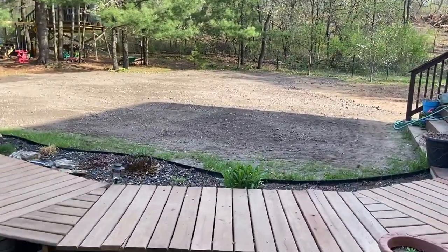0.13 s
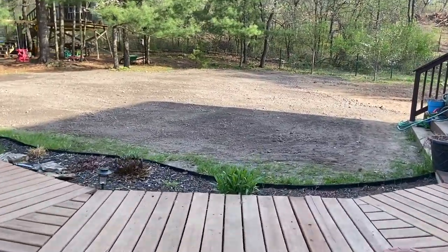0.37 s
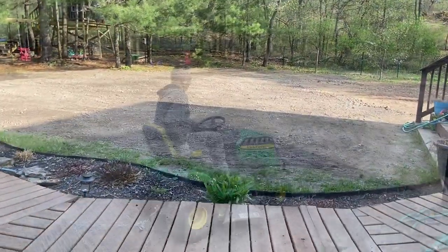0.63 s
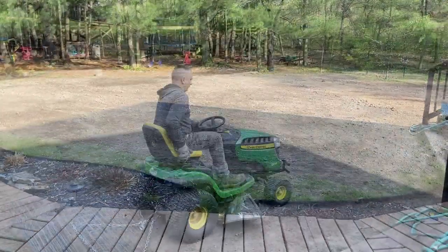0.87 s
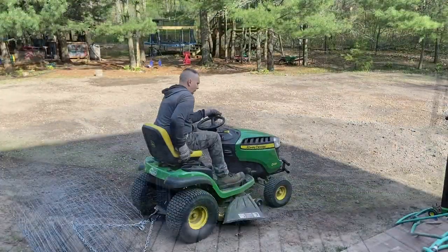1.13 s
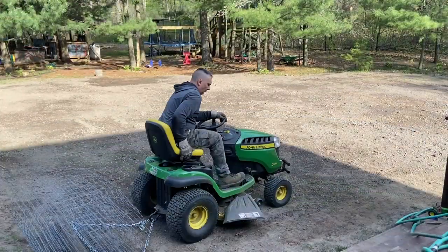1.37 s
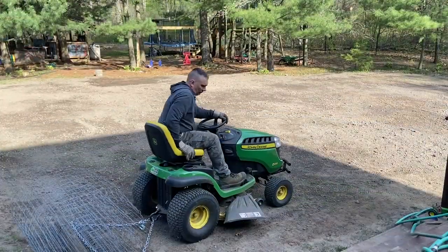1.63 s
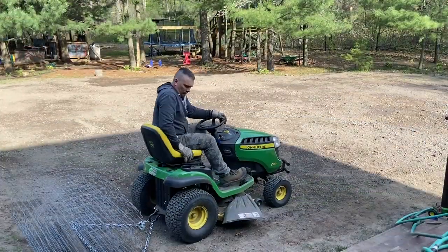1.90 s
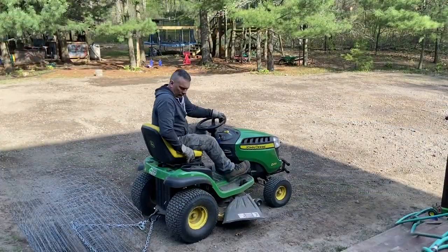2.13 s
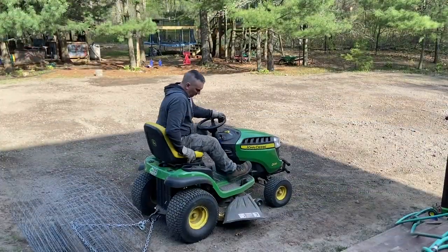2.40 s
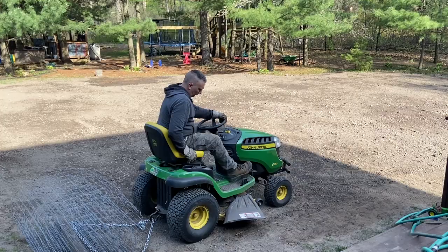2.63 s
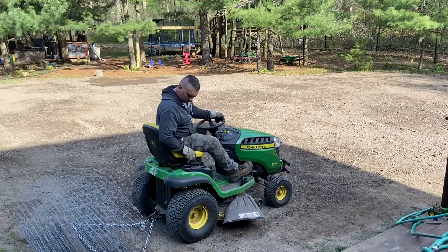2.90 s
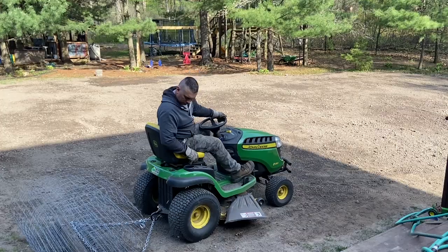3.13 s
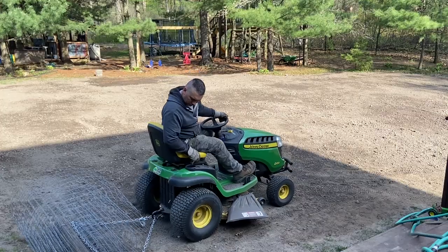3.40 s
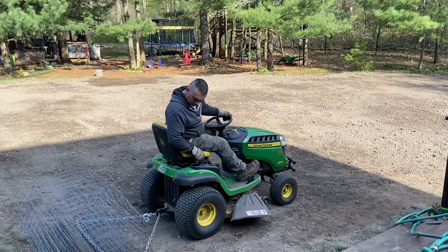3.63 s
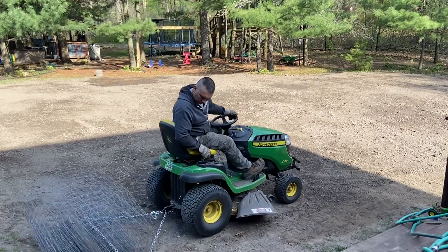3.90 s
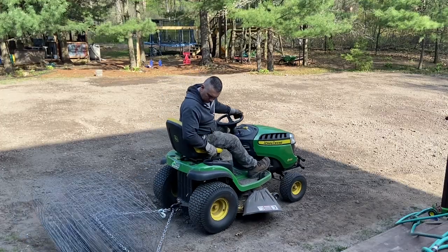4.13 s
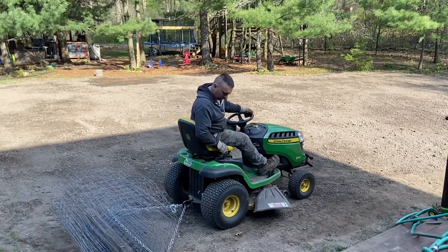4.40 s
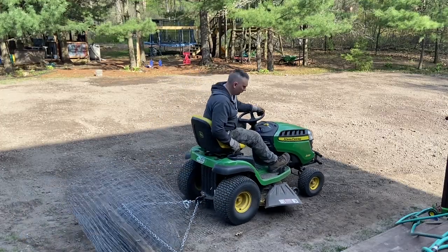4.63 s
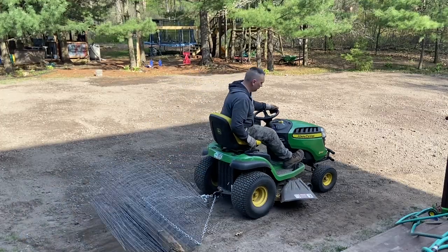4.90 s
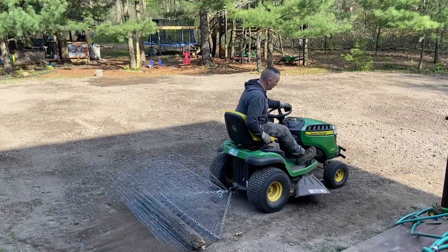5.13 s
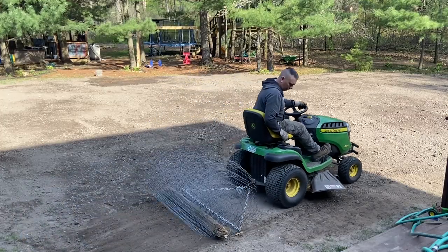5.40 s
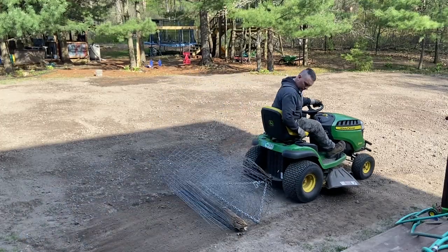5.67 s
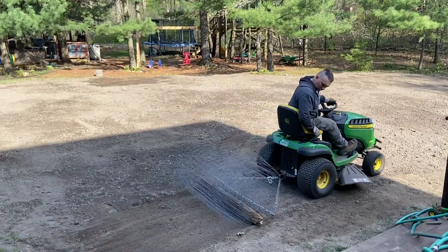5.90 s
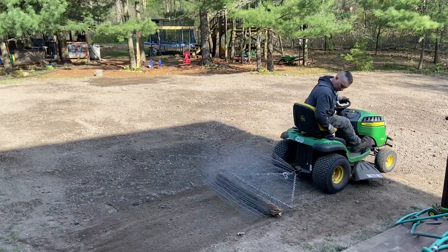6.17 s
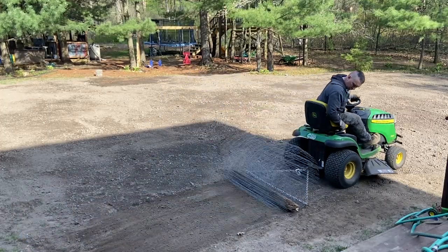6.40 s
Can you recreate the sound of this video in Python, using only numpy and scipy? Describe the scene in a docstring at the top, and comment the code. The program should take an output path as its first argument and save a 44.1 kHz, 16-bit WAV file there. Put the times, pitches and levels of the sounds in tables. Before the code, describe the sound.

Soft wind and small ticks fade into a steady, uneven mower chug, then metallic scraping over dirt and brief chain clinks.

```python
"""A quiet, breezy yard: wind lumps, faint crackles and a raspy hiss give way to a nearby riding mower.
Its two cylinders fire unevenly, a throbbing stack of low sine orders under noise for fan roar, valves and tin.
Filtered grit noise makes a wire drag scraping over dirt; decaying high sines make its chain clink.
The engine labours as the drag bites, then its levels shift as the mower turns away."""
import sys
import numpy as np
from scipy import signal
from scipy.io import wavfile
from scipy.ndimage import uniform_filter1d

SR = 44100
rng = np.random.default_rng(int(sys.argv[2]) if len(sys.argv) > 2 else 0)


def transcribe(u):
    """Save the signal u as a 16-bit wav file named by the first command-line argument.

    u: samples, shape (n,) or (channels, n), limited to [-1, 1]; the rate is SR.
    q: integer samples, one column per channel.
    """
    v = np.clip(np.atleast_2d(u).T, -1, 1)
    q = np.round(v * 32767).astype(np.int16)
    wavfile.write(sys.argv[1], SR, q)


def field_ratio(decibels):
    """Amplitude ratio for a level in dB (20 dB per decade); scalars and array-likes work."""
    return 10 ** (np.asarray(decibels, dtype=float) / 20)


N = 287973

# Hiss colour of the valves and of the drag's rustle: f/Hz, relative density/dB
HISS_COLOUR = [(1200, -10.5), (2500, -1.5), (4500, -5), (5500, -9), (8000, -10), (11000, -15), (15800, -23)]
# Engine speed: t/s, cycle rate/Hz
ENGINE_SPEED = [(0.5, 21.3), (0.58, 21.5), (1.0, 23.0), (1.1, 23.3), (1.36, 23.3), (1.54, 23.0),
                (2.7, 22.7), (3.4, 22.1), (3.52, 21.9), (3.79, 21.7), (3.93, 21.7), (4.13, 22.0),
                (5.39, 22.8), (5.89, 22.5), (6.31, 22.2), (6.46, 21.8), (6.53, 21.6)]


def evened(x):
    """Scales a signal to rms 1."""
    return x / np.sqrt(np.mean(abs(x) ** 2) + 1e-20)


def curves(rows):
    """Reads each column of a timed table at every sample."""
    s, *columns = np.transpose(rows)
    return [np.interp(np.arange(N) / SR, s, c, left=c[0]) for c in columns]


def side_share(pan_db):
    """Share of the sum fed to the difference for a left-right lean; milder than an exact pan."""
    return (field_ratio(pan_db) - 1) / (field_ratio(pan_db) + 2.5)


def noise(spectrum, patchy_db, size=1024):
    """Random short-time spectra with drifting patches, as sum and difference of two microphone ports."""
    # Independent part of the difference: f/Hz, level over the sum/dB
    apart_colour = [(40, -28), (90, 2), (200, -2.5), (400, -6), (700, -9.5), (1300, -7.5), (2300, -11),
                    (2700, -15), (4400, -22), (4800, -3.5), (6300, -9), (6900, -24), (8000, -22), (8300, 1),
                    (10100, 0), (10400, -29), (11700, -26), (12000, 1), (14400, 1), (14700, -33)]
    # Bands where the sum is nearly empty and the difference carries the noise:
    # low f/Hz, high f/Hz, change of the sum/dB
    sum_gaps = [(8350, 9600, -40), (12800, 14100, -40)]
    # Stereo lean: f/Hz, nominal left over right/dB
    lean_colour = [(60, 1), (800, -2.5), (1500, -1.5), (2800, 1.3), (5500, 4), (7500, 1)]
    hop = size // 4
    hz = np.fft.rfftfreq(size, 1 / SR)

    def read(points):
        f, db = np.transpose(points)
        return np.interp(np.log(hz + 1), np.log(f + 1), db)

    a, b, c, d, patches = rng.standard_normal((N // hop + 5, len(hz), 5)).T
    patches = uniform_filter1d(patches, 10, axis=0)
    patches = evened(uniform_filter1d(patches, 12, axis=1))
    sum_db = read(spectrum)
    apart_db = sum_db + read(apart_colour)
    for lo_hz, hi_hz, change_db in sum_gaps:
        sum_db[(hz > lo_hz) & (hz < hi_hz)] += change_db
    total = (a + 1j * b) * field_ratio(sum_db)[:, None]
    apart = (c + 1j * d) * field_ratio(apart_db)[:, None]
    apart = apart + total * side_share(read(lean_colour))[:, None]
    frames = np.array([total, apart]) * field_ratio(patchy_db * patches)
    x = signal.istft(frames, nperseg=size, noverlap=size - hop)[1][:, :N]
    return x / np.sqrt(np.mean(x[0] ** 2))  # the sum has rms 1


def band(x, hz, width):
    """A steep resonance of gain 1: shift its pitch to zero, smooth twice, shift back."""
    turn = np.exp(2j * np.pi * np.cumsum(hz * np.ones(N)) / SR)
    r = np.exp(-np.pi * width / SR)
    return 2 * (turn * signal.lfilter([(1 - r) ** 2], [1, -2 * r, r * r], x / turn)).real


def wind():
    """Wind lumps on the microphone: deep filtered noise, nearly all in the sum."""
    # Rumble: t/s, level/dB
    wind_levels = [(0.0, -31), (0.118, -39), (0.192, -45), (0.226, -42), (0.3, -50), (0.576, -51),
                   (0.62, -51)]
    low = signal.butter(2, [40, 95], "band", fs=SR, output="sos")
    rumble = evened(signal.sosfilt(low, rng.standard_normal((2, N))))
    return rumble * [[1], [.04]] * field_ratio(curves(wind_levels)[0])


def rasp():
    """A raspy narrow hiss: resonant noise in two soft-edged stretches."""
    # Stretches: start t/s, length/s, level at start/dB, level at end/dB
    stretches = [(0.0, .085, -54, -60), (0.098, 0.329, -74, -52)]
    edge_s = 0.011
    t, swell = np.arange(N) / SR, np.zeros(N)
    for s, long_s, start_db, end_db in stretches:
        glide = field_ratio(start_db + (end_db - start_db) * np.clip((t - s) / long_s, 0, 1))
        swell += glide * np.clip(np.minimum(t - s + edge_s, s + long_s - t) / edge_s, 0, 1)
    narrow = evened(band(rng.standard_normal((2, N)), 1740, 240))
    return narrow * [[1], [.3]] * swell


def air():
    """Still yard air: faint, very patchy noise."""
    # Air colour: f/Hz, relative density/dB
    air_colour = [(150, -27), (250, 3), (1190, -5), (1740, -8), (2340, -6.5), (7490, -21.5), (8610, -35),
                  (10600, -25), (15800, -34)]
    return noise(air_colour, patchy_db=5.0, size=512) * field_ratio(-58)


def knock():
    """A soft knock on the camera: a decaying sine whose pitch sags."""
    # Knock: t/s, level before the decay/dB, f reached 2 ms in/Hz, t60/s
    bump = (.082, -26, 210, .16)
    s, db, hz, t60 = bump
    t = np.maximum(np.arange(N) / SR - s, 0)
    onset = 1 - np.exp(-(t / 0.0047) ** 2)
    sagging = np.sin(2 * np.pi * hz * 0.013 * np.log(1 + t / 0.011))
    return np.outer([1, 0], field_ratio(db - 60 * t / t60) * onset * sagging)


def crackles():
    """Small dry crackles: fast-decaying bright noise, some placed by chance."""
    # Placed crackles: t/s, nominal level/dB, nominal left over right/dB
    placed = [(0.0428, -51.5, 1.0), (0.1595, -50.5, 1.0), (0.2309, -41.5, 1.0), (0.2584, -54.5, -2.0),
              (0.2788, -59, 0.5), (0.3716, -52.5, 1.0), (0.4754, -50, 2.5), (0.4844, -48, 2.5),
              (0.5871, -54.5, -2)]
    faint = [(0.6 * u, -61, 1.5) for u in rng.random(size=6)]  # same columns, within 0.6 s
    out, t = np.zeros((2, N)), np.arange(1000) / SR
    bright = signal.butter(1, [6000, 13000], "band", fs=SR, output="sos")
    for s, db, pan_db in placed + faint:
        snap = signal.sosfilt(bright, rng.standard_normal((2, 1000))) * field_ratio(db - 60 * t / 0.024)
        out[:, round(s * SR):][:, :1000] += [snap[0], snap[0] * side_share(pan_db) + snap[1]]
    return out


def yard():
    """Wind, rasp, air, knock and crackles, faded out from 0.6 to 1.1 s."""
    fade_out = np.clip((1.1 - np.arange(N) / SR) / .5, 0, 1)
    return (wind() + rasp() + air() + knock() + crackles()) * fade_out


def jolt():
    """The frame hums briefly and dully as the chain pulls taut: resonant noise, rising then decaying."""
    # Hum: t/s, level before rise and decay/dB, f/Hz, width/Hz, rise/s, t60/s
    frame_hum = (3.37, -31, 388, 40, .06, .5)
    s, db, hz, width, rise, t60 = frame_hum
    t = np.maximum(np.arange(N) / SR - s, 0)
    envelope = np.minimum(t / rise, 1) * field_ratio(db - 60 * np.maximum(t - rise, 0) / t60)
    hum = evened(band(rng.standard_normal(N), hz, width)) * envelope
    return np.outer([1, .1], hum)


def chain():
    """Links knock together: a noise tick and a short ring of high decaying sines."""
    # Ring partials: f/Hz, level within the ring/dB, t60 before the length factor/s
    partials = [(5530, -7, 0.062), (6670, -1, 0.035), (10200, -11, 0.034), (12340, -8, 0.069)]
    # Clinks: t/s, ring level/dB, ring length factor, nominal tick level/dB
    clinks = [(4.203, -20.5, 0.3, -41), (4.499, -30.5, 1.3, -52), (5.95, -30, .3, -48)]
    out, t = np.zeros(N + 4000), np.arange(4000) / SR
    for s, ring_db, long, tick_db in clinks:
        ring = np.zeros(4000)
        for f, db, t60 in partials:
            ring += field_ratio(ring_db + db - 60 * t / (t60 * long)) * np.sin(2 * np.pi * f * t)
        tick = field_ratio(tick_db - 60 * t / 0.045) * np.diff(rng.standard_normal(4001))
        out[round(s * SR):][:4000] += (ring + tick) * np.minimum(t / 0.0012, 1)
    return np.outer([1, .4], out[:N])


def drag():
    """Grit strikes the wires: dense clicks into a broad ring, wire modes that come and go, and a rustle."""
    # Scrape over dirt: t/s, nominal level/dB
    scrape = [(2.5, -100), (2.9, -57), (3.3, -44), (3.85, -40.5), (4.2, -42), (4.8, -41.5), (5.3, -45.5),
              (5.8, -45.5), (6.5, -48)]
    # Wire modes: f/Hz, width/Hz, level over the broad ring/dB
    wire_modes = [(1855, 100, -17), (2247, 96, -7.5), (2360, 77, -7), (2585, 64, -7.5), (2768, 86, -14),
                  (3160, 50, -11), (3326, 54, -11.5), (3700, 90, -12)]
    t, knots = np.arange(N) / SR, np.arange(0, N / SR + .3, .2)
    strength = field_ratio(2.6 * np.minimum(rng.exponential(1, N), 4))
    struck = rng.random(N) < 2500 / SR  # about 2500 clicks per second
    grit = strength * struck * rng.standard_normal(N)
    wires = evened(band(grit, 2460, 1700))
    touches = rng.standard_normal((len(knots), len(wire_modes))).T
    for (hz, width, db), touch in zip(wire_modes, touches):
        wires += field_ratio(db + 2.1 * np.interp(t, knots, touch)) * evened(band(grit, hz, width))
    density = evened(uniform_filter1d(abs(grit), 300))
    rustle = noise(HISS_COLOUR, patchy_db=5.5, size=256) * density
    return (np.outer([1, .1], wires) + field_ratio(-2.0) * rustle) * field_ratio(curves(scrape)[0])


def level(free_db, load_db, away_db, slope_db):
    """A level in dB that shifts with engine load, the turn away and speed (dB per Hz about 22.5 Hz)."""
    # Load eases after revving up and peaks as the drag bites: t/s, share 0-1
    load = [(1.2, 0.54), (1.8, 0), (3.2, .14), (3.8, 1), (4.2, 0.96), (5.2, 0.9), (5.7, 0.4), (6.5, 0.66)]
    turn_start_s, turn_s = 4.45, 1.88
    away = np.clip((np.arange(N) / SR - turn_start_s) / turn_s, 0, 1)
    faster_hz = curves(ENGINE_SPEED)[0] - 22.5
    return free_db + load_db * curves(load)[0] + away_db * away + slope_db * faster_hz


def exhaust(turns, hz, second=1.1, waver_db=.6, waver_turns=.01):
    """Sine orders of two uneven firings, turned in phase by the muffler chamber."""
    # Orders from 2 up: rms running free/dB, change at full load/dB, change turned away/dB, slope/(dB per Hz)
    order_levels = [(-31, 0.5, -4.0, 2.5), (-25, -7.5, 0, -4), (-35, -6, -19, 0), (-20.5, 3.5, 1.5, 2),
                    (-29, -1, -11, 3), (-27.5, 1.5, -4.5, 1), (-23.5, -1.0, 0.5, -3), (-33.5, 0.5, 3, 1),
                    (-30, -0.5, -6.5, 2), (-32, -2.0, 1.5, 8), (-39.5, -8, -4, 3.5), (-43.5, -4, 3, 0.0),
                    (-54, 2.5, -1, 3), (-54, 5.0, -3, 1), (-39, 0, -1, 4), (-40.5, 3.0, -8.5, -1),
                    (-42.5, 4, -10, 3.5), (-39.0, 2, -13, 3), (-55, 2, -4, -3), (-51.5, 9.5, -1, 4)]
    # Muffler chamber: f/Hz, width/Hz, phase lead below resonance/rad
    muffler = (104, 6, .66)
    # Moments when the engine burns unevenly: t/s
    stumbles = [1.47, 2.33, 2.8, 5.45]
    # A resonance climbing through the upper orders during the pull: t/s, f/Hz, boost/dB
    climb = [(3.3, 353, -2), (3.8, 349, 2.5), (4.5, 395, -0.5), (4.9, 462, 5.5), (5.5, 470, 4.5),
             (5.9, 478, -1)]
    climb_width_hz = 23
    second_firing = .362  # share of a cycle between the V engine's two pulses, one pipe being shorter
    order = np.arange(len(order_levels)) + 2
    half_gap = np.exp(1j * np.pi * order * second_firing)
    ring_hz, width, lead = muffler
    f = order * hz.mean()
    chamber_phase = lead - np.arctan2(f * width, ring_hz ** 2 - f ** 2)
    phase = np.angle(half_gap + second / half_gap) + chamber_phase
    knots = np.arange(0, N / SR + .1, .045)  # chance wavers: no two cycles burn alike
    chance = rng.standard_normal((len(knots), len(order), 2))
    unrest = sum(np.exp(-((knots - s) / 0.037) ** 2) for s in stumbles)
    chance *= 1 + 1.1 * unrest[:, None, None]
    t, out = np.arange(N) / SR, np.zeros(N)
    strongest_db = level(*max(order_levels))
    climb_hz, boost_db = curves(climb)
    for k, (m, rule) in enumerate(zip(order, order_levels)):
        db = level(*rule) + boost_db * np.exp(-((m * hz - climb_hz) / climb_width_hz) ** 2)
        loose = np.clip((strongest_db - db) / 12, .1, 1.4)  # weak orders waver more
        slip = waver_turns * loose * np.interp(t, knots, chance[:, k, 1])
        db += waver_db * loose * np.interp(t, knots, chance[:, k, 0])
        out += field_ratio(db) * np.cos(2 * np.pi * (m * turns + slip) + phase[k])
    throb = np.sqrt(2) * out
    lean_db = level(free_db=-1.7, load_db=-.3, away_db=1.3, slope_db=0)  # nominal left over right
    return np.array([throb, throb * side_share(lean_db)])


def puffs(turns, at, depth, width):
    """A swell once in each engine cycle, at a given share of the cycle."""
    return evened(1 + depth * np.exp((np.cos(2 * np.pi * (turns - at)) - 1) / width))


def fan_roar(turns):
    """Low, broad noise with a slight swell each cycle."""
    # Roar colour: f/Hz, relative density/dB
    roar_colour = [(30, -3), (70, 5), (130, -2), (220, -3), (310, -3.5), (420, -3.5), (700, -3), (1000, -7),
                   (1500, -13), (3000, -67)]
    roar = noise(roar_colour, patchy_db=0.72, size=2048) * puffs(turns, at=1.0, depth=0.074, width=0.11)
    return roar * field_ratio(level(free_db=-27.5, load_db=-0.1, away_db=-5, slope_db=0.6))


def tin_clatter(turns):
    """Mid noise plus tin resonances of hood and deck, louder and softer by chance."""
    # Clatter colour: f/Hz, relative density/dB
    clatter_colour = [(500, -20), (1000, -5), (1400, 2), (1900, 0), (2500, -7), (3500, -14), (7000, -29)]
    # Hood and deck resonances: f/Hz, width/Hz, level over the plain clatter/dB
    tin_modes = [(520.5, 33, -9.5), (656, 23, -12), (843.4, 14, -9), (981, 24, -10), (1249, 7.5, -12.5),
                 (1380, 11.4, -8), (1542, 17, -14.5), (1770, 9.6, -13.5), (2435, 28, -18.5),
                 (4420, 73, -19.5)]
    rattle_db, rattle_s = 0.8, .09  # spread and spacing of the chance levels
    clatter, shake = noise(clatter_colour, patchy_db=0.27), rng.standard_normal(N)
    for f, width, db in tin_modes:
        clatter[0] += field_ratio(db) * evened(band(shake, f, width))
    t = np.arange(N) / SR
    chance_db = rattle_db * np.interp(t / rattle_s, np.arange(200), rng.standard_normal(200))
    clatter *= puffs(turns, at=0.32, depth=0.31, width=0.14)
    return clatter * field_ratio(level(free_db=-35, load_db=0, away_db=-2, slope_db=1.2) + chance_db)


def valve_hiss(turns):
    """High noise that swells once a cycle when the valves shut."""
    hiss = noise(HISS_COLOUR, patchy_db=1.22, size=512) * puffs(turns, at=0.47, depth=0.42, width=0.1)
    return hiss * field_ratio(level(free_db=-39.5, load_db=0, away_db=-5, slope_db=0.2))


def mower():
    """Roar, clatter, hiss and exhaust locked to one engine cycle, fading in along a bent ramp."""
    fade_start_s, fade_s, fade_bend = 0.49, 0.69, 1.59
    hz, = curves(ENGINE_SPEED)
    turns = np.cumsum(hz) / SR + 0.2966
    fade_in = np.clip((np.arange(N) / SR - fade_start_s) / fade_s, 0, 1) ** fade_bend
    return (fan_roar(turns) + tin_clatter(turns) + valve_hiss(turns) + exhaust(turns, hz)) * fade_in


def scene():
    """Mixes all sources; sum and difference of the ports become left and right."""
    total, apart = yard() + jolt() + chain() + drag() + mower()
    return np.array([total + apart, total - apart])


def top_cut(x):
    """Nothing passes above the cut-off."""
    return signal.sosfilt(signal.butter(12, 16880, fs=SR, output="sos"), x)


def record(dry):
    """The microphone drops the deepest bass and the top treble."""
    high_pass = signal.butter(2, 30, "high", fs=SR, output="sos")
    thin = signal.sosfilt(high_pass, dry)
    low_pass = signal.firwin(511, 15800, window=("kaiser", 9), fs=SR)
    mix = signal.oaconvolve(thin, low_pass[None], "same")
    return top_cut(mix)


dry = scene()
out = record(dry)
transcribe(out)
```